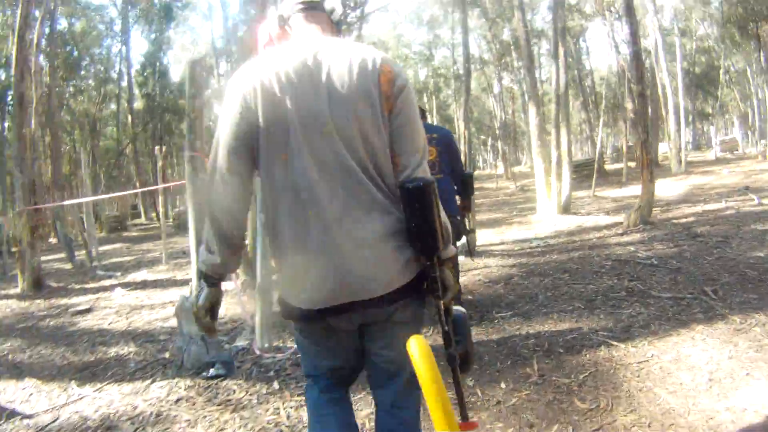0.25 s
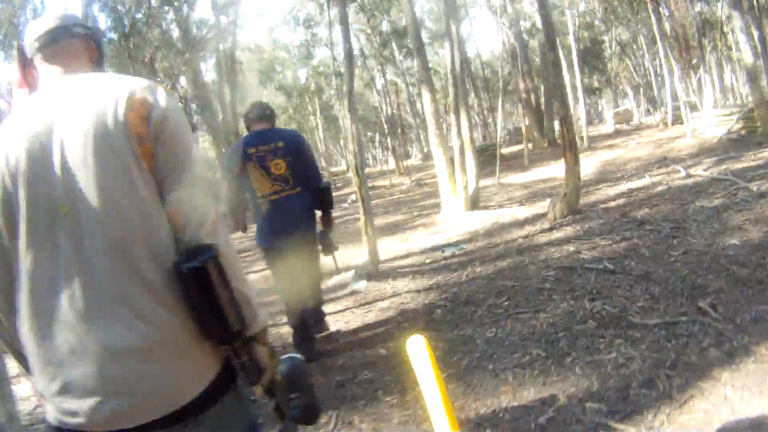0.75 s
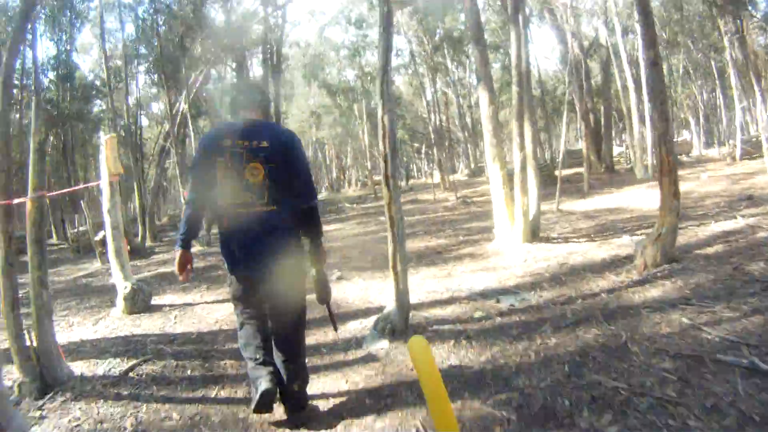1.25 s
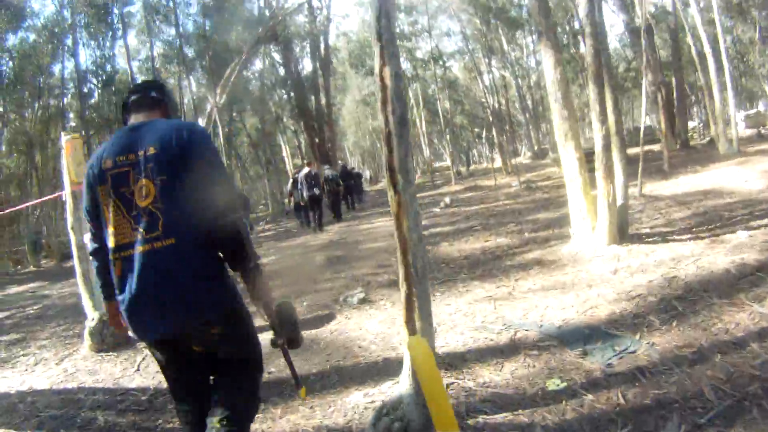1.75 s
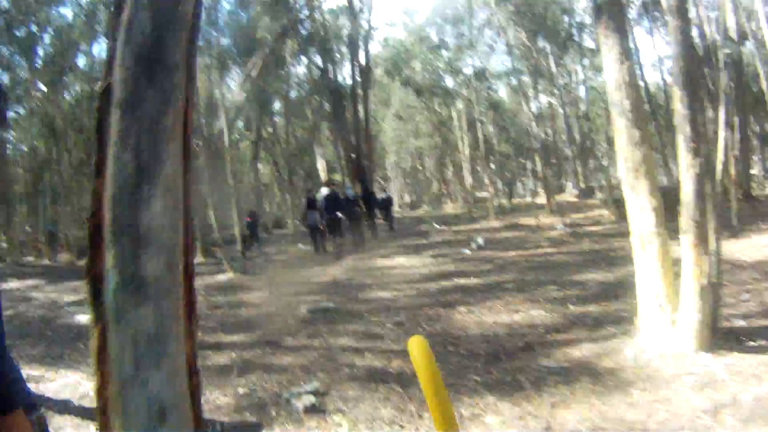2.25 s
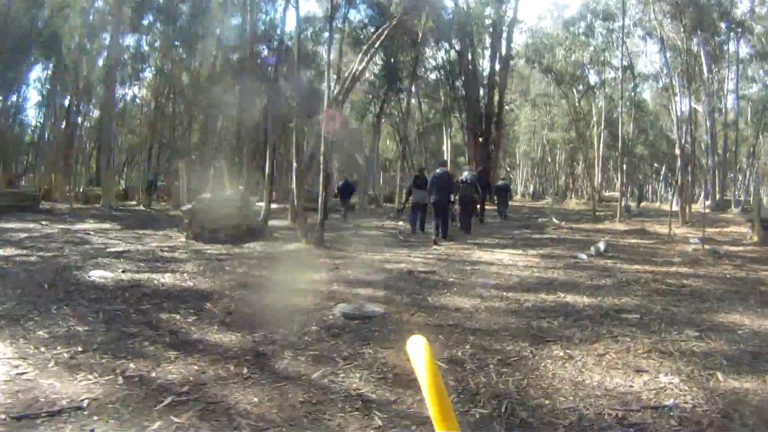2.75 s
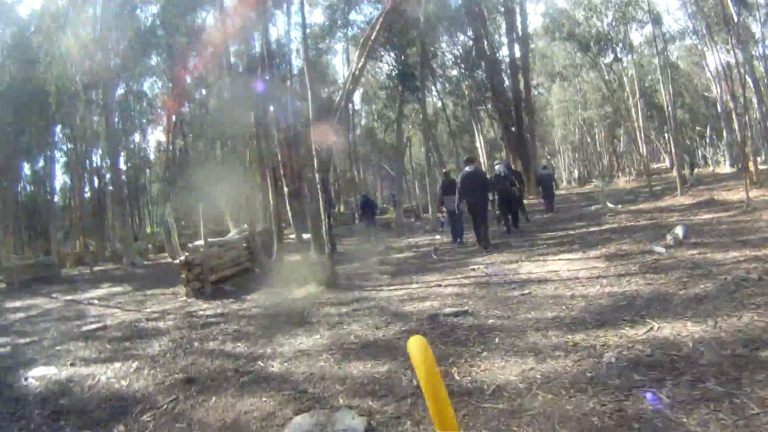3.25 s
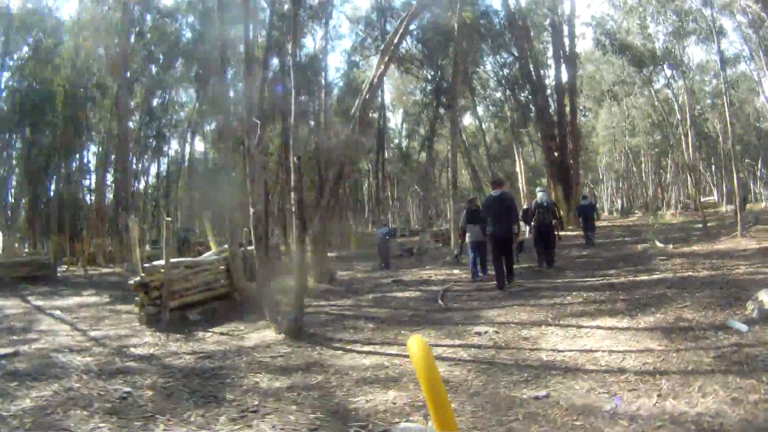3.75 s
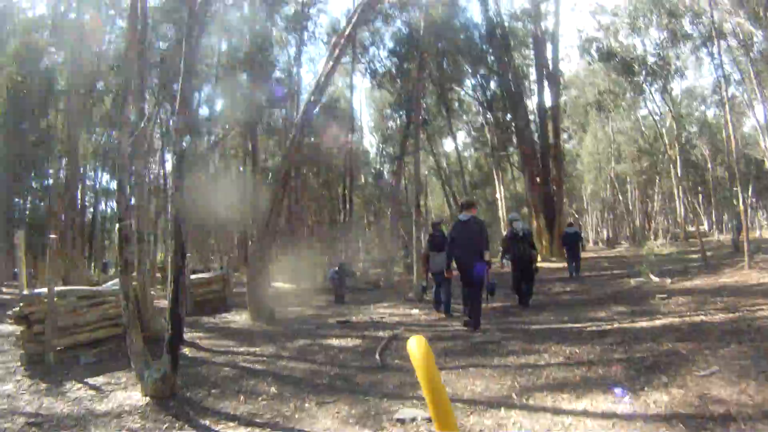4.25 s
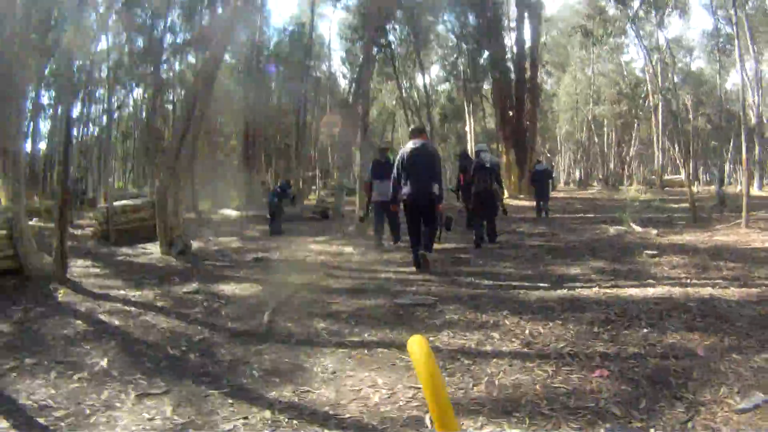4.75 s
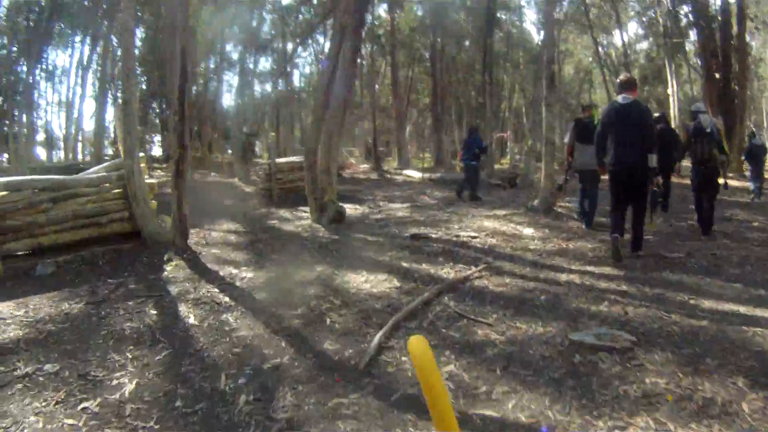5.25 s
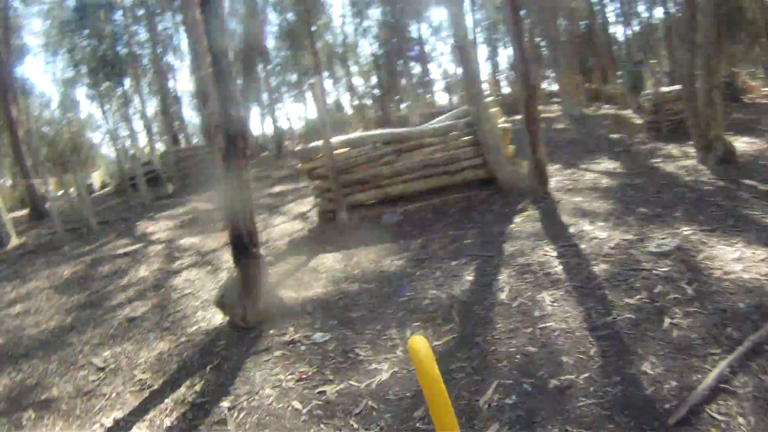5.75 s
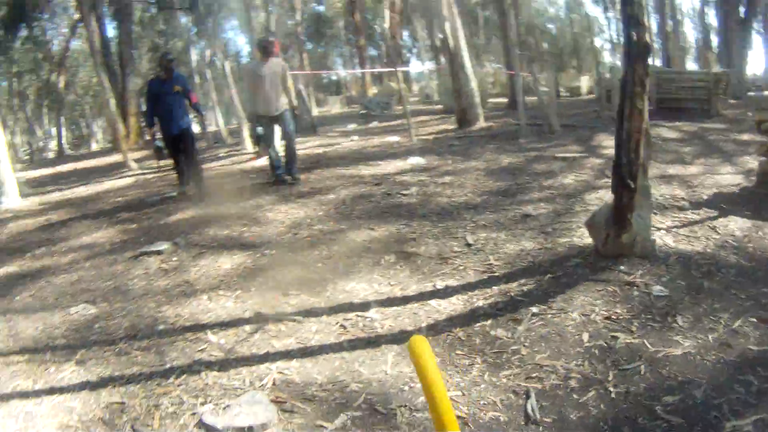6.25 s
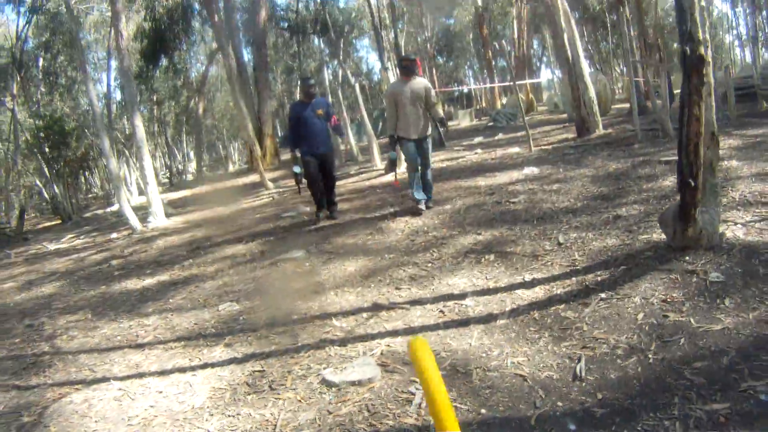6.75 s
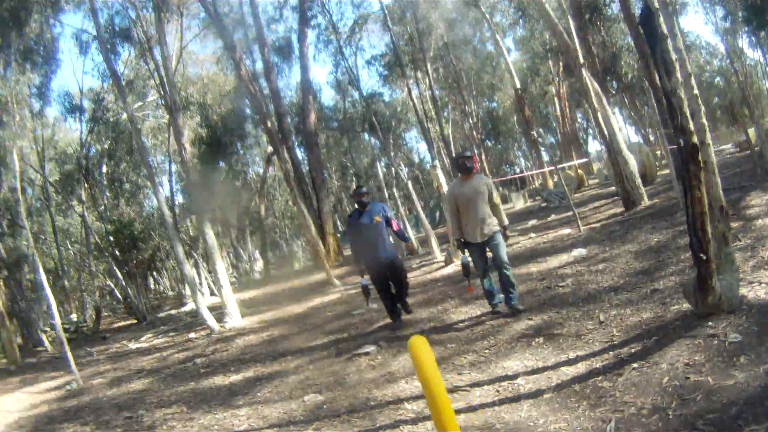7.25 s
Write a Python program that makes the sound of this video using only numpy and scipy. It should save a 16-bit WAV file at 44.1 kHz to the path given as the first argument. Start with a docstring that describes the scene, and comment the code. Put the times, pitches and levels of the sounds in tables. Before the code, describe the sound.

A steady faint hiss sits under a close, boxy outdoor sound, as from a microphone shut in a plastic case. In the first half second there are only crisp ticks, thin crackle and light low bumps. Around 0.65 s a heavier foot crunches into dry leaves and bark, followed by strong crunches and snaps near 1.4, 2.0 and 2.6 s, with grainy drags between. Each tread jolts the carried mount, giving dull low thuds and a short wavering hum. From 3.3 to 5.5 s the steps become dense and irregular, with a very sharp overloaded crack at 3.7 s and hard snaps near 3.95, 4.35 and 4.7 s. After 5.5 s it is thinner: softer drags, brushing swishes, scattered snaps, bumps at about 6.1 and 7.1 s, and a last scuff near 7.4 s. The treble is gritty and coarse.

```python
"""A walker crosses dry leaves and bark, heard by a camera shut in a plastic case on a carried mount.
Over steady hiss, crisp ticks and thin crackle come first; then feet land and drag, crunching in grains.
The crunch rings through the case, and each step also pushes and jolts the mount, which hums at its low mode.
Sharp snaps and soft noise swishes soon join in, and all of it goes on in uneven steps to the end.
The recorder samples at 12 kHz and holds each sample, so mirror copies of the sound lie around 12 kHz."""
import sys
import numpy as np
from scipy import signal
from scipy.fft import rfft, irfft
from scipy.io import wavfile

SR = 44100
rng = np.random.default_rng(int(sys.argv[2]) if len(sys.argv) > 2 else 0)


def put_to_file(sound):
    """Save the sound as 16-bit audio at rate SR, in the file named by the first command-line argument."""
    columns = np.atleast_2d(sound).T  # one column per channel
    safe = np.clip(columns, -1, 1)
    whole_steps = np.round(safe * 32767)
    wavfile.write(sys.argv[1], SR, whole_steps.astype(np.int16))


def ratio_of_db(decibels):
    """Turn decibels (scalar or array-like) into linear amplitude factors; 0 dB maps to 1."""
    return 10 ** (np.asarray(decibels, float) / 20)


N = 330448  # length in samples

# What the case rings with, from low to high, in three groups.
# Each row: pitch in Hz, width in Hz (wider dies sooner), relative strength in dB.
CASE_BODY = [(395.4, 67.5, -7.5), (518, 132, -1.5), (621.5, 116, 2), (706, 32, -8.5), (877, 178, 0),
             (1080, 224, -1.5), (1240, 228, -7), (1407.5, 118, -5)]
CASE_UPPER = [(1410, 506, 0), (1790, 243, 1.5), (1986, 263, 5), (2360, 250, -21), (2474, 130, -13)]
CASE_TREBLE = [(2900, 510, -5), (3590, 570, 1.5), (4083, 360, 4), (4720, 730, -2), (5500, 1400, -5.5)]
# A foot lands: sudden crunch that sags.
# Each row: start in seconds, length in seconds, level at the start in dB,
# upper case modes in dB relative to that level, jolt to the mount at the start in dB.
LANDINGS = [(0.126, 0.1, -35.5, -9.5, -34), (0.382, 0.023, -41, 0.5, -32.5),
            (0.659, 0.27, -16.5, -11.5, -24.5), (1.133, 0.036, -45, 0.5, -43.5),
            (1.391, 0.19, -18, -17, -21), (2.012, 0.19, -18.5, -6.5, -24.5),
            (2.63, 0.32, -20.5, -10, -24.5), (3.315, 0.076, -23.5, -10, -25),
            (3.724, 0.1, -25.5, -8.5, -25.5), (3.949, 0.057, -13, -9.5, -20.5),
            (4.1, 0.079, -23.5, -11, -24.5), (4.346, 0.043, -20.5, -7.5, -23.5),
            (4.544, 0.01, -36.5, -7, -39), (4.622, 0.074, -15, -7, -22), (4.729, 0.16, -18.5, -8, -24),
            (5.028, 0.028, -24, -1.5, -26.5), (5.137, 0.031, -34, -1.5, -34.5),
            (5.274, 0.15, -23, -12.5, -28.5), (5.536, 0.24, -34, -8.5, -33.5),
            (6.101, 0.033, -36.5, -3, -34), (6.634, 0.013, -34, -11, -32.5), (6.686, 0.011, -47, -11, -41),
            (7.092, 0.027, -23.5, -11.5, -26.5)]


def evened(x):
    """Scales to rms 1."""
    return x / np.sqrt(np.mean(x ** 2) + 1e-20)


def slow(hz):
    """Smooth random wandering of rms 1, mostly slower than hz."""
    lowpass = signal.butter(2, hz, fs=SR, output="sos")
    return evened(signal.sosfilt(lowpass, rng.standard_normal(N)))


def filtered(x, response):
    """Passes x through an impulse response."""
    return signal.oaconvolve(x, response)[:N]


def ringing(modes):
    """Impulse response of energy 1; each mode swells and dies (a doubled pole), neighbours in opposite phase."""
    t = np.arange(8192) / SR
    ring = np.zeros(len(t))
    for k, (hz, width, db) in enumerate(modes):
        swell_and_die = width ** 2 * t * np.exp(-np.pi * width * t)
        ring += (-1) ** k * ratio_of_db(db) * swell_and_die * np.sin(2 * np.pi * hz * t)
    return ring / np.linalg.norm(ring)


def blows(s, peak_db):
    """One impulse per event."""
    train = np.zeros(N)
    np.add.at(train, np.round(s * SR).astype(int), ratio_of_db(peak_db))
    return train


def grains(per_s, spread_db, clump_db, clump_hz):
    """Tiny breaks of random sign and size, coming in clumps, scaled to rms 1."""
    sign = rng.choice([-1., 1.], N)
    size = ratio_of_db(spread_db * np.minimum(rng.exponential(1, N), 2.4))
    breaks = rng.random(N) < per_s / SR
    clumps = ratio_of_db(clump_db * np.clip(slow(clump_hz), -3, 1.1))
    return evened(sign * size * breaks * clumps)


def envelope(rows, db, rise_db, drift_db, fall_db, ending=False):
    """Summed power, every 1 ms, of events that rise, drift and fall in straight lines (slopes in dB per s).

    The level db holds at an event's start, or at its end if ending is set."""
    start, length = np.transpose(rows)[:2, :, None]
    t = np.arange(0, N / SR, 1 / 1000) - start
    rise = rise_db * np.minimum(t, 0)
    drift = drift_db * (np.clip(t, 0, length) - ending * length)
    fall = fall_db * np.maximum(t - length, 0)
    return (ratio_of_db(db[:, None] + rise + drift - fall) ** 2).sum(axis=0)


def gain(power, rest_db):
    """Gain per sample from power on the 1 ms grid, never under the rest level."""
    per_sample = np.interp(np.arange(N) / SR * 1000, np.arange(len(power)), power)
    return np.sqrt(per_sample + ratio_of_db(rest_db) ** 2)


def treads():
    """Power of crunch, upper crunch and jolt: landings sag from their start, drags swell to their end."""
    # A foot drags. Each row: start in seconds, length in seconds, level at the end in dB,
    # upper case modes in dB relative to that level, jolt to the mount at the end in dB.
    drags = [(0.35, 0.041, -47, 4, -56), (1.35, 0.059, -53, 1.5, -48), (1.968, 0.054, -42, 4, -35),
             (1.656, 0.16, -23, -8, -26.5), (1.004, 0.036, -45.5, -14, -56),
             (2.266, 0.22, -33, -6.5, -34.5), (2.57, .05, -40.5, 2, -40), (3.031, 0.093, -30, -10.5, -34.5),
             (3.537, 0.1, -24, -12, -33), (4.26, 0.054, -30, -9, -33), (5.627, 0.25, -30, -7.5, -36),
             (5.892, 0.089, -29.5, -16, -33), (6.227, .14, -26.5, -14.5, -33),
             (6.389, 0.13, -32.5, -7, -34.5), (6.867, 0.088, -31.5, -9, -31.5),
             (7.248, 0.058, -43, -16, -41.5), (7.417, .09, -28.5, -12, -32.5)]
    land, drag = np.transpose(LANDINGS), np.transpose(drags)
    land_slopes = dict(rise_db=747, drift_db=-52, fall_db=255)
    drag_slopes = dict(rise_db=293, drift_db=44, fall_db=295.5, ending=True)
    body = envelope(LANDINGS, land[2], **land_slopes)
    body = body + envelope(drags, drag[2], **drag_slopes)
    upper = envelope(LANDINGS, land[2] + land[3], **land_slopes)
    upper = upper + envelope(drags, drag[2] + drag[3], **drag_slopes)
    jolt = envelope(LANDINGS, land[4], rise_db=345, drift_db=-35.5, fall_db=206)
    jolt = jolt + envelope(drags, drag[4], rise_db=262, drift_db=8, fall_db=215, ending=True)
    return body, upper, jolt


def hiss():
    """Faint steady noise of air and electronics."""
    # The colour of the hiss. Each row: frequency in Hz, relative strength in dB.
    hiss_colour = [(20, -15), (250, -9), (2500, -21.5), (6000, -29)]
    hz, db = np.transpose(hiss_colour)
    colour = ratio_of_db(np.interp(np.log(np.fft.rfftfreq(N, 1 / SR) + 1), np.log(hz), db))
    noise = irfft(rfft(rng.standard_normal(N)) * colour, N)
    return ratio_of_db(-60) * evened(noise)


def ticks():
    """Crisp ticks heard only in the treble: each blow rings the treble modes, with a short fizz."""
    # Single crisp treble ticks; the one at 3.7 s is the crackle of overload.
    # Each row: time in seconds, peak of the ring in dB.
    treble_ticks = [(0.09, -39.5), (0.3244, -43), (0.389, -40.5), (0.6135, -33.5), (1.6416, -33),
                    (1.7581, -35.5), (2.1223, -38), (2.267, -35.5), (2.3306, -41.5), (2.368, -37.5),
                    (2.5566, -44), (2.5745, -35.5), (2.7067, -33), (3.4795, -40.5), (3.5443, -38),
                    (3.5982, -36), (3.7, -26), (3.9357, -38), (4.349, -33), (5.467, -43), (5.531, -53),
                    (5.56, -52), (5.9254, -41), (6.8533, -40), (6.9182, -40.5)]
    s, peak_db = np.transpose(treble_ticks)
    dying = np.exp(-np.arange(2000) / SR / 0.0084)  # time constant in s
    fizz = filtered(blows(s, peak_db - 21.0), dying) * rng.standard_normal(N)
    ring = ringing(CASE_TREBLE)
    return filtered(blows(s, peak_db) + fizz, ring / abs(ring).max())


def crunch():
    """Leaves break in grains; part of the grains is common to all groups of modes."""
    # Bursts of thin leaf crackle that leak in through the air.
    # Each row: start in seconds, length in seconds, level at the start in dB.
    crackles = [(0.093, 0.017, -56), (0.332, 0.056, -58), (0.628, .09, -52), (0.744, 0.11, -51.5),
                (0.916, 0.034, -61.5), (1.307, 0.033, -61), (1.406, .18, -51), (1.644, 0.19, -54),
                (2.005, .19, -59), (2.24, 0.058, -71.5), (2.575, .08, -57), (2.693, .14, -57),
                (3.052, 0.017, -51.5), (3.315, 0.12, -53.5), (3.54, 0.052, -50.5), (3.698, 0.04, -56),
                (3.862, 0.029, -57), (3.931, .24, -51.5), (4.255, 0.045, -61), (4.335, 0.078, -55.5),
                (4.531, .3, -53.5), (5.018, 0.047, -58), (5.505, 0.22, -66.5), (5.93, 0.034, -70.5),
                (6.058, 0.11, -60.5), (6.32, 0.56, -65), (6.841, 0.074, -74), (7.074, 0.031, -60.5),
                (7.417, .05, -61)]
    # Modes of the mount shaken by each jolt, and a high case mode that rubbing wakes.
    # Each row: pitch in Hz, width in Hz, relative strength in dB.
    mount = [(136.4, 20.9, 5.5), (169.8, 88, -2), (202.5, 84, -3)]
    scrape = [(3670, 340, 0)]
    body_power, upper_power, jolt_power = treads()
    level, upper_level = gain(body_power, rest_db=-62), gain(upper_power, rest_db=-66)
    jolt = gain(jolt_power, rest_db=-55)
    bursts = envelope(crackles, np.transpose(crackles)[2], rise_db=891, drift_db=-4, fall_db=700)
    crackle = gain(bursts, rest_db=-73)

    common = grains(700, spread_db=8.0, clump_db=6.5, clump_hz=32.8)
    body = 0.49 * common + 0.42 * grains(1300, spread_db=3.0, clump_db=8.5, clump_hz=33.0)
    upper = 0.84 * common + 0.3 * grains(700, spread_db=0.5, clump_db=21.0, clump_hz=46)
    treble = 0.49 * common + 0.79 * grains(1400, spread_db=11.0, clump_db=14.5, clump_hz=69)
    rumble = 0.33 * common + 0.97 * grains(600, spread_db=5.5, clump_db=4.5, clump_hz=52)
    rubbing = ratio_of_db(-32.5) * rng.standard_normal(N)
    return (filtered(level * body, ringing(CASE_BODY))
            + filtered(upper_level * upper, ringing(CASE_UPPER))
            + filtered(upper_level * rubbing, ringing(scrape))
            + filtered(crackle * treble, ringing(CASE_TREBLE))
            + filtered(jolt * rumble, ringing(mount)))


def crush():
    """Under the falling weight many leaves break at once: a short dense roar in the case's lower modes."""
    start, length, level_db = np.transpose(LANDINGS)[:3]
    rows = np.transpose([start, np.minimum(length, 0.033)])  # only the first moment of a landing, in s
    power = envelope(rows, level_db - 3.5, rise_db=2500, drift_db=-39, fall_db=406)
    dense = grains(5000, spread_db=2.5, clump_db=0.0, clump_hz=90)
    return filtered(gain(power, rest_db=-120) * dense, ringing(CASE_BODY))


def push():
    """Lumpy low noise that comes with each landing and follows the strength of its jolt."""
    jolt_db = np.transpose(LANDINGS)[4]
    power = envelope(LANDINGS, jolt_db - 7, rise_db=195, drift_db=-97, fall_db=84.5)
    lumps = ratio_of_db(0.84 * slow(13))
    noise = filtered(rng.standard_normal(N), ringing([(33, 320, 0)]))  # a very broad mode at 33 Hz
    return gain(power, rest_db=-59) * lumps * noise


def hum():
    """The mount's main mode: a wavering near-sine with a fuzz of noise around it."""
    # Louder stretches of the low hum; the long one from 5.57 s is its quiet, randomly beating floor.
    # Each row: start in seconds, length in seconds,
    # level at the start in dB before wavering and mixing, middle pitch of the mode in Hz.
    stretches = [(0.137, 0.013, -23, 84.3), (0.184, 0.051, -23.5, 85.5), (.37, 0.026, -14, 84.5),
                 (0.624, 0.085, -16.5, 89.1), (0.768, 0.068, -13, 88), (0.855, 0.16, -24, 85.3),
                 (1.138, 0.045, -33.5, 97), (1.346, 0.1, -20.5, 93.2), (1.507, .04, -17.5, 85),
                 (1.686, 0.11, -14.5, 82.45), (1.863, 0.03, -25, 85), (2.015, .13, -16.5, 84),
                 (2.145, 0.17, -21, 85.65), (2.352, 0.1, -19.5, 82.5), (2.6, 0.075, -21, 89),
                 (2.736, 0.051, -18.5, 85.5), (3.074, 0.061, -23.5, 93), (3.4, 0.061, -13.5, 80.6),
                 (3.522, 0.054, -18.5, 84.85), (3.764, 0.042, -19.5, 86.6), (4.01, 0.17, -15.5, 85.83),
                 (4.31, 0.18, -23, 83), (4.556, 0.39, -23, 92.54), (4.999, 0.08, -14, 82.5),
                 (5.272, 0.21, -24, 88.65), (5.566, 0.54, -24, 81.8), (6.131, 0.042, -15.5, 86.84),
                 (6.444, 0.15, -24, 84.2), (6.87, 0.052, -24, 93), (7.08, 0.084, -16, 83),
                 (7.37, 0.097, -26.5, 81.5)]
    # Noise around the main mode. Each row: pitch in Hz, width in Hz, relative strength in dB.
    fuzz_modes = [(85.1, 45.6, 0)]
    start, length, level_db, mode_hz = np.transpose(stretches)
    power = envelope(stretches, level_db, rise_db=519, drift_db=-23, fall_db=381.5)
    jolt = treads()[2]
    level = gain(power + ratio_of_db(2) ** 2 * jolt, rest_db=-41)  # jolts add to the hum, 2 dB up
    hz = np.interp(np.arange(N) / SR, start + length / 2, mode_hz)
    wavering_hz = hz * (1 + 0.038 * slow(10.2))
    tone = np.sqrt(2) * np.sin(2 * np.pi * np.cumsum(wavering_hz) / SR)
    fuzz = filtered(rng.standard_normal(N), ringing(fuzz_modes))
    return level * ratio_of_db(1.7 * slow(26)) * (0.85 * tone + 0.5 * fuzz)


def snaps():
    """A few cycles at the snap's pitch, a ring of the case, and a dying shower of grains behind it."""
    # Single snaps felt through the case. Each row: time in seconds, peak of the cycles in dB,
    # pitch in Hz, the shower of grains it sets off in dB relative to the peak.
    snap_rows = [(0.378, -22, 1700, -7), (0.598, -35.5, 1850, -12), (0.657, -35, 898, -22),
                 (0.72, -17, 1800, -20), (0.804, -13, 1870, -7), (0.926, -18, 2010, 0),
                 (1.009, -32, 915, -11), (1.063, -44, 910, -10), (1.083, -34, 1870, -18),
                 (1.185, -30.5, 1118, -44), (1.324, -29.5, 1940, -17), (1.387, -10, 1134, -5),
                 (1.496, -27, 1340, 8), (1.506, -6.5, 1320, -9.5), (1.527, -14.5, 1070, -14),
                 (1.583, -10.5, 951, -20), (1.764, -23.5, 1161, -4.5), (2.012, -7.5, 1076, -14),
                 (2.125, -10, 1510, -10.5), (2.159, -15, 1370, -23), (2.33, -10.5, 1710, -16),
                 (2.458, -23, 910, -40), (2.582, -18.5, 1790, -9.5), (2.64, -7, 1213, -9.5),
                 (2.73, -18, 1121, 0), (3.106, -22, 1221, -26), (3.315, -19, 1080, -22),
                 (3.382, -12, 1770, -33), (3.404, -15, 1810, -3), (3.7, -0.5, 1790, -29),
                 (3.731, -23, 982.4, -2.5), (3.947, -6, 1148, -15), (4.053, -13.5, 1870, -14.5),
                 (4.113, -13, 1208, -4.5), (4.159, -12, 973, -10.5), (4.348, -7, 1780, -22.5),
                 (4.501, -27.5, 1100, -15), (4.544, -25, 1800, -21), (4.626, -9.5, 1094, -27.5),
                 (4.7, -5, 1697, -19), (4.735, -41.5, 932.3, -8.5), (4.755, -11.5, 1240, -1),
                 (5.025, -17.5, 946.7, -19), (5.278, -13.5, 920, -10), (5.469, -11.5, 1240, -19),
                 (5.529, -18, 1760, -27), (5.559, -18.5, 1833, -20), (5.967, -24.5, 967, -2),
                 (6.082, -13.5, 1730, -11.5), (6.449, -23.5, 1130, -42), (6.637, -20.5, 1020, -36),
                 (6.694, -27.5, 1120, -23), (7.104, -11.5, 1110, -27), (7.15, -14, 1830, -12),
                 (7.422, -27, 1014, -9)]
    s, peak_db, pitch_hz, shower_db = np.transpose(snap_rows)
    t = np.arange(600) / SR
    cycles = np.zeros(N + 600)
    for at, peak, hz in zip(np.round(s * SR).astype(int), ratio_of_db(peak_db), pitch_hz):
        u = hz * t / 1.05  # swells for about two cycles, then dies
        cycles[at:at + 600] -= peak * (u / 2) ** 2 * np.exp(2 - u) * np.sin(2 * np.pi * hz * t)
    case = ringing(CASE_BODY) + 0.82 * ringing(CASE_UPPER)
    ring = filtered(blows(s, peak_db - 9), case / abs(case).max())
    dying = filtered(blows(s, peak_db + shower_db), np.exp(-np.arange(4000) / SR / 0.0093))
    shower = filtered(dying * grains(2500, spread_db=3.0, clump_db=3.0, clump_hz=80), case)
    return cycles[:N] + ring + shower


def swish():
    """Soft rubbing noise in the upper case modes, as of cloth or a shoe brushing leaves."""
    # Each row: start in seconds, length in seconds, level at the start in dB before fluttering.
    swishes = [(.43, 0.075, -69), (0.603, 0.035, -50.5), (1.223, 0.055, -67), (1.926, 0.078, -52.5),
               (2.452, 0.055, -84), (3.178, 0.091, -54.5), (5.109, .05, -46.5), (5.48, .04, -53.5),
               (6.12, 0.066, -48), (6.454, 0.092, -62), (6.819, .05, -62.5), (7.025, 0.055, -50),
               (7.179, .04, -65), (7.36, 0.091, -50.5)]
    power = envelope(swishes, np.transpose(swishes)[2], rise_db=312, drift_db=11, fall_db=422)
    flutter = ratio_of_db(7.4 * slow(40))
    rubbing = gain(power, rest_db=-120) * flutter * rng.standard_normal(N)
    return filtered(rubbing, ringing(CASE_UPPER))


def scene():
    """All sounds meet at one microphone."""
    return (hiss() + ticks() + crunch() + crush() + push() + hum() + snaps() + swish())[None]


def roll_off(x):
    """The treble ends steeply here."""
    return signal.sosfilt(signal.butter(12, 15480, fs=SR, output="sos"), x)


def record(dry):
    """Band limit, 12 kHz sampling with each sample repeated four times, overload and top edge."""
    hold_hz, repeats = 12000, 4
    band_limit = signal.firwin(121, 5800, window=("kaiser", 8), fs=SR)
    limited = signal.oaconvolve(dry, band_limit[None], "same")
    # sampling copies the band around 12 kHz
    mirrored = limited * (1 + 2 * np.cos(2 * np.pi * hold_hz * np.arange(N) / SR))
    hz = np.fft.rfftfreq(N, 1 / SR)
    hold = np.sinc(hz / hold_hz) / np.sinc(hz / (repeats * hold_hz))  # the staircase weakens the copies
    overloaded = np.clip(irfft(rfft(mirrored) * hold, N), -1, 1)
    top_edge = signal.firwin(101, 15600, window=("kaiser", 8), fs=SR)
    edged = signal.oaconvolve(overloaded, top_edge[None], "same")
    return roll_off(edged)


dry = scene()
out = record(dry)
put_to_file(out)
```